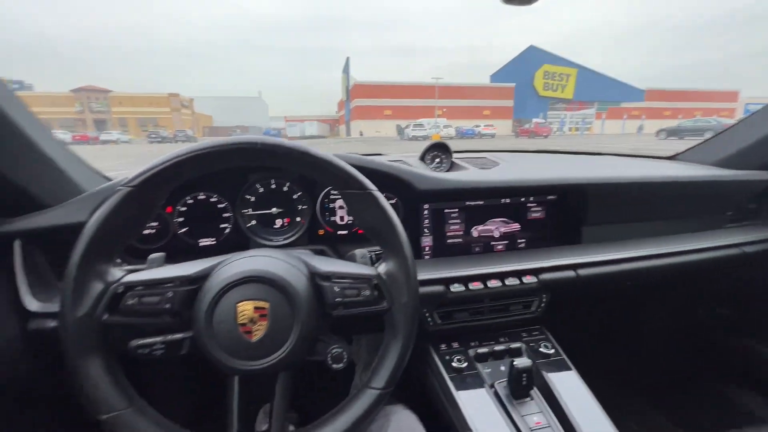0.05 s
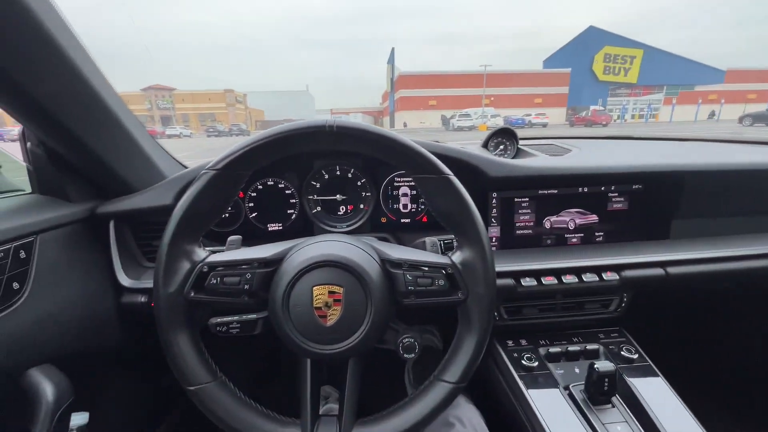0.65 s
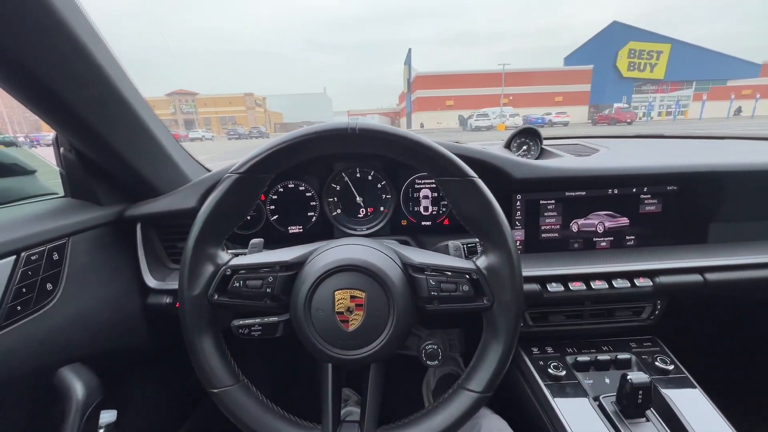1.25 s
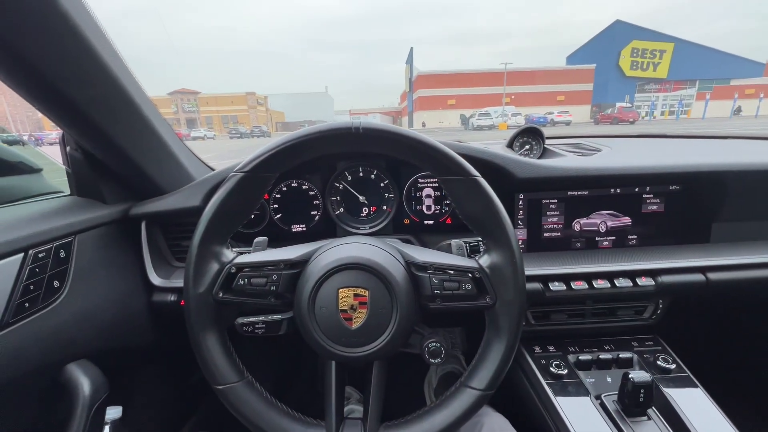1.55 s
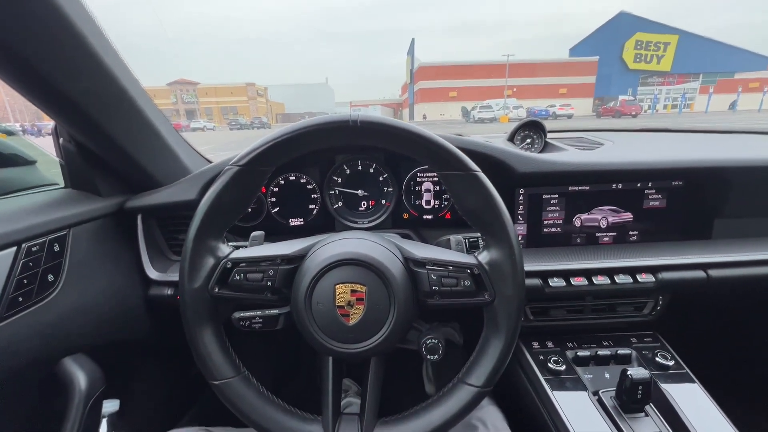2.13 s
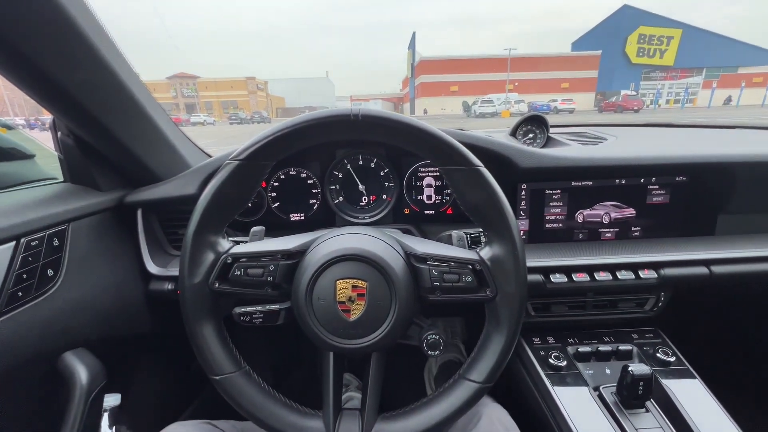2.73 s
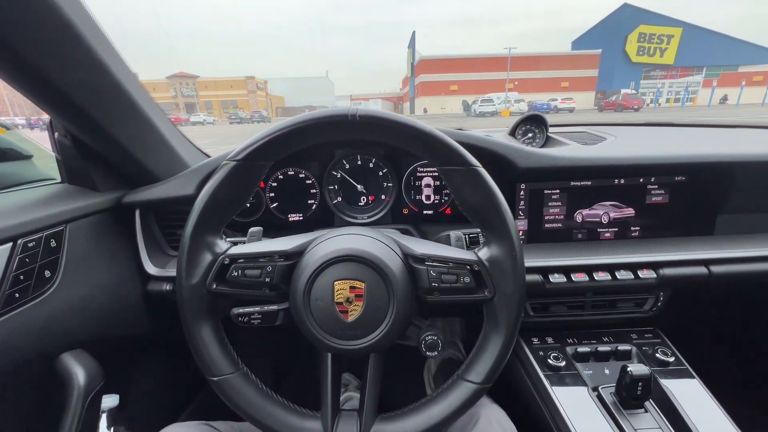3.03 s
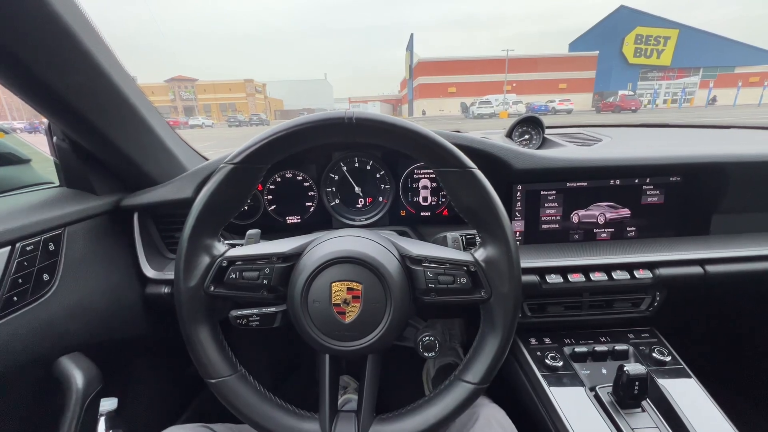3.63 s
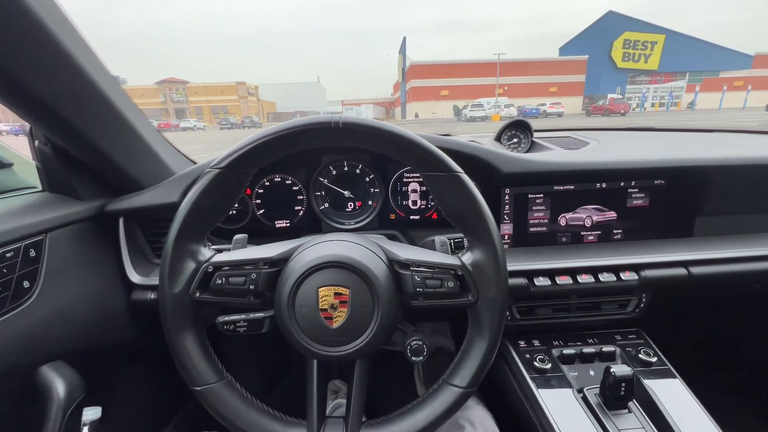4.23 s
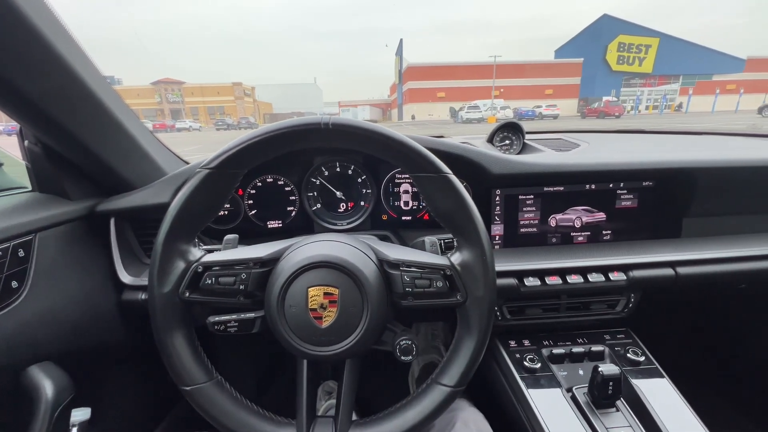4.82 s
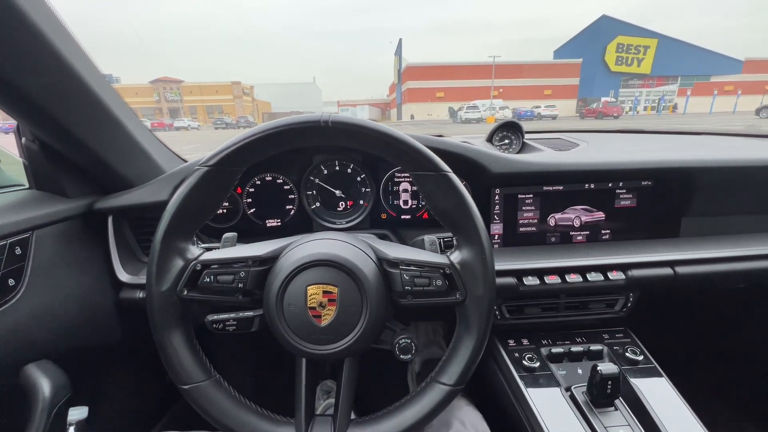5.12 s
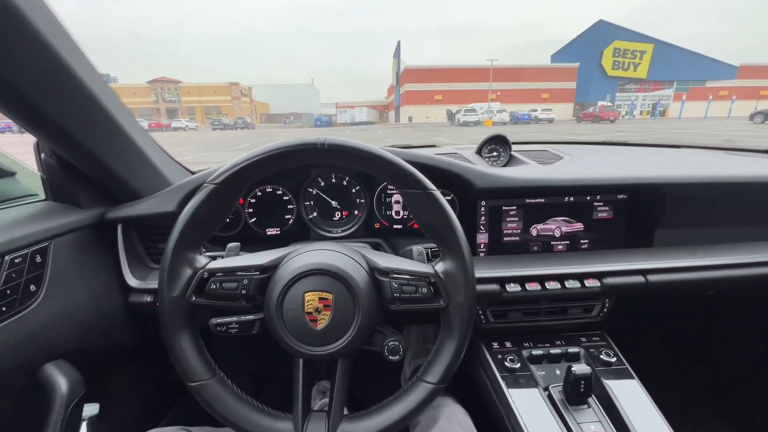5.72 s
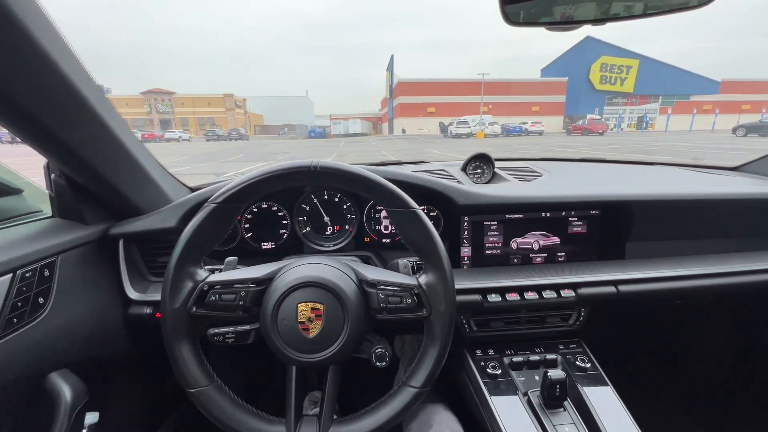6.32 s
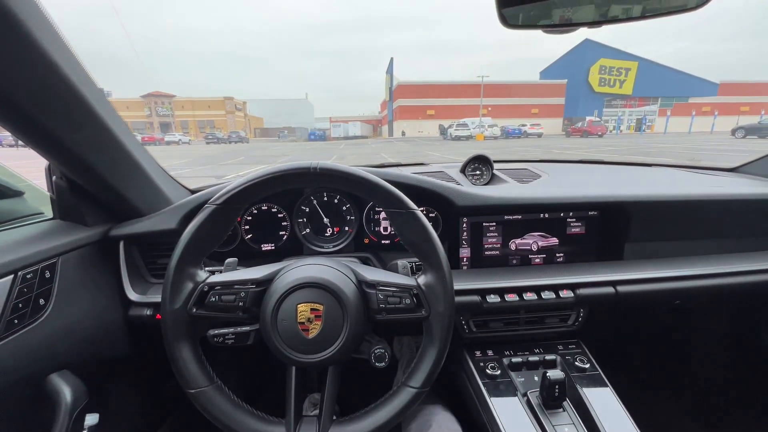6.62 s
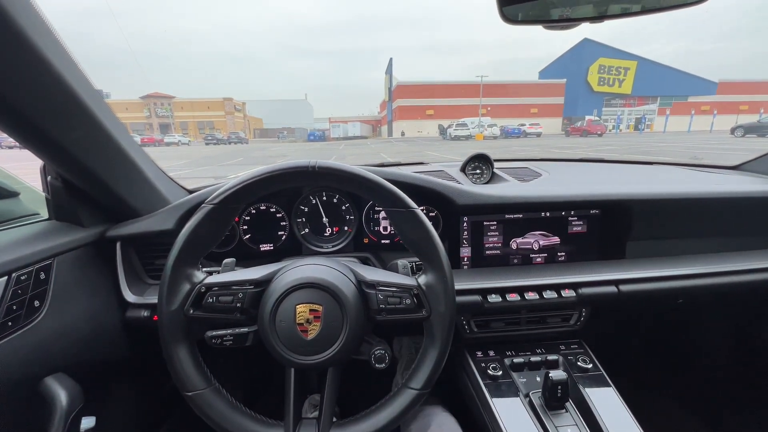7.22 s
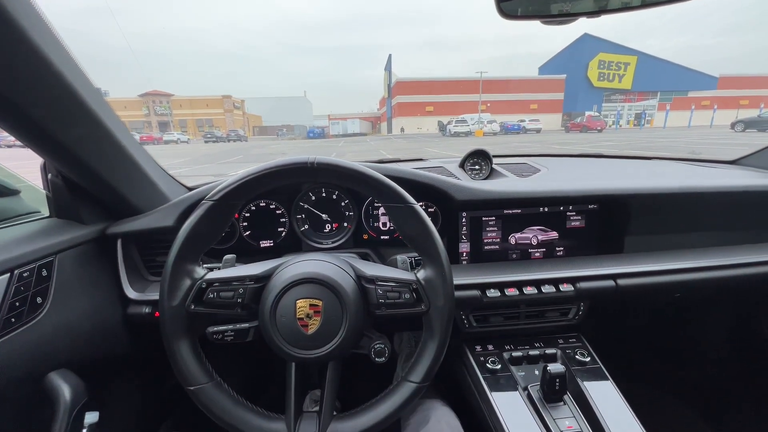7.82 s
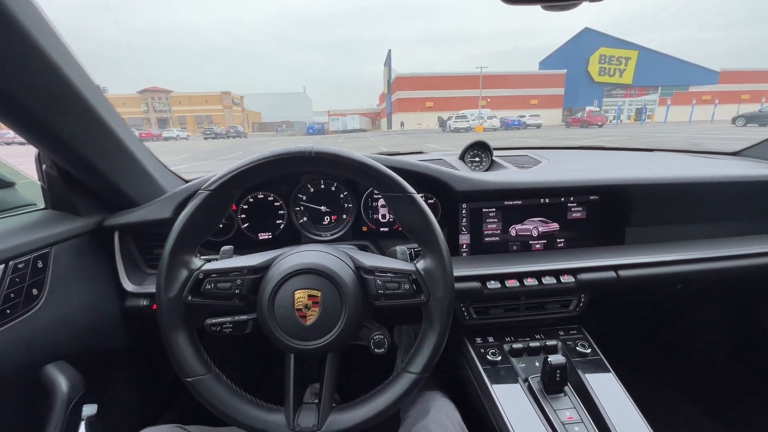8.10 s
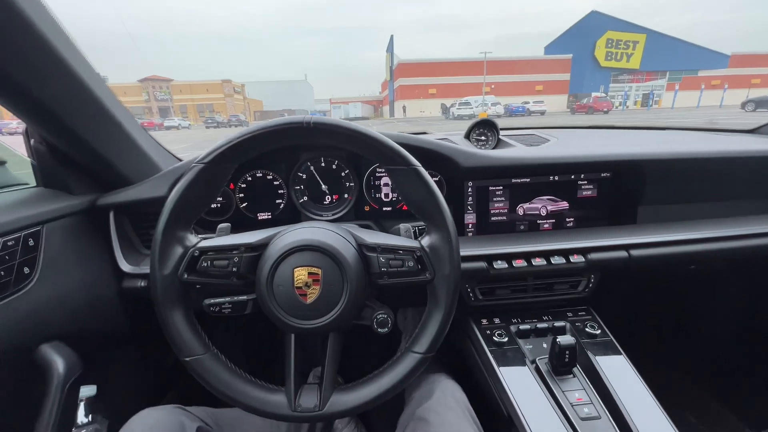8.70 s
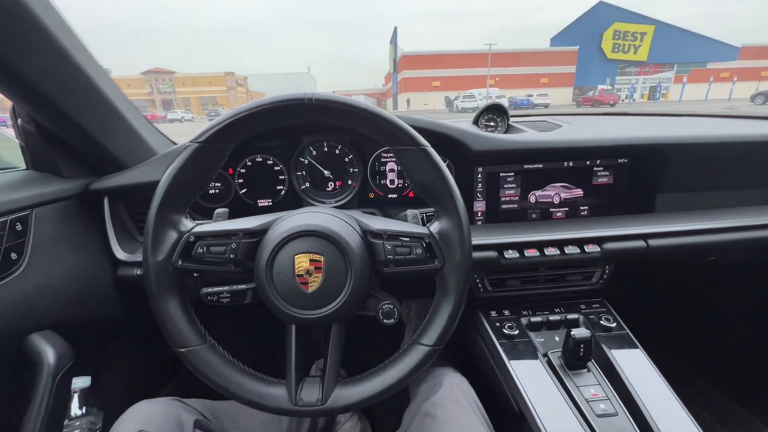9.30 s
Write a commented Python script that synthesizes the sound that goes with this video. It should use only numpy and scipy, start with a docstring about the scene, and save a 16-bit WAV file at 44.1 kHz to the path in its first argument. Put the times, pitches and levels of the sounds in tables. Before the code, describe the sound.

A parked sports car idles low and smooth, then the throttle is blipped eight times, about once a second. Each rev sweeps up into a booming growl with a light rush of intake air and turbo hiss. As the revs sink, the exhaust gives a brief howl, muffled pops and deep thuds, while a faint whine falls. It is heard in stereo from the driver's seat inside the closed cabin.

```python
"""A low, smooth idle, then eight blips of the throttle: a parked flat-six sports car, on a stereo
microphone at the driver's seat. The firing tone sweeps up through the booming cabin. As the revs sink,
the silencer howls, unburnt fuel pops and thuds in the exhaust and a belt-driven whine falls. From the
engine bay, beyond the bulkhead, come intake rush, turbine hiss, valve chatter and a tick as the throttle
shuts. The fuel pump and the ventilation lie faintly underneath."""
import sys
import numpy as np
from scipy import signal
from scipy.fft import irfft
from scipy.io import wavfile
from scipy.ndimage import uniform_filter1d

SR = 44100
rng = np.random.default_rng(int(sys.argv[2]) if len(sys.argv) > 2 else 0)


def bounce(signal):
    """Save signal as a 16-bit WAV file at the path given by the first command-line argument."""
    frames = np.transpose(np.atleast_2d(signal))
    limited = np.clip(frames, -1, 1)
    pcm = np.round(limited * 32767).astype(np.int16)
    wavfile.write(sys.argv[1], SR, pcm)


N = 421155
T = np.arange(N) / SR

# Pedal blips: start t/s, throttle shuts t/s, burble ends t/s, starting firing f/Hz, top firing f/Hz,
# coast-down/(Hz/s), then level/dB for coasting tone, rumble, rasp, whine, pulling tone, chatter, howl,
# bark and turbine hiss
BLIPS = [(.612, 0.887, 1.54, 49, 174.4, 121.6, -5, -.5, -0.5, 3, -0.5, -1.5, -7, -35.5, 3),
         (2.115, 2.37, 2.95, 55.55, 176.9, 132.3, 1, -1, 0, 3, -1, -1.5, 1.5, -33, 3.5),
         (3.275, 3.425, 3.95, 77.97, 156.6, 103.6, 3.5, 0.5, 0.5, -5, -1.5, -1.5, -1.5, -31.5, 4.5),
         (4.204, 4.32, 4.87, 93.22, 156.2, 112.1, -0.5, 0, .7, 0.5, 1, -2.5, -1.5, -33, 4.5),
         (5.048, 5.186, 5.58, 88.6, 154.6, 111.8, 4, 0, 1, 0.5, -1.5, -1.5, -6.5, -31, 3),
         (6.016, 6.25, 6.80, 75.87, 174.8, 140.1, -8.5, -1, -0.6, 2.5, -1, -8, -0.5, -34, 0),
         (6.84, 7.0, 7.6, 116.6, 177.9, 114, -1, -1.5, -0.4, 0.5, 2.5, -7.5, -10, -27.5, 0),
         (8.366, 8.646, 8.5, 59.97, 175.3, 113.1, -3.5, -0.5, -2, -1, -2, -1, -5, -35.5, 0)]
# Firing tone, loud where it meets a cabin mode: firing f/Hz, pulling level/dB, coasting level/dB
TONE_BY_SPEED = [(40.5, -40, -35.5), (47.5, -18, -46), (52.6, -16.5, -19.5), (68, -9, -26),
                 (82, -20.5, -39), (102, -13, -28.5), (149, -22.5, -26.5), (160.4, -21, -28.5),
                 (172, -27, -22.5)]
# Exhaust rasp: firing f/Hz, pulling level/dB, coasting level/dB
RASP_BY_SPEED = [(41, -50, -58.5), (65.4, -44.5, -52), (115, -38, -46.5), (128, -33.5, -37.5),
                 (145, -32.5, -40), (171, -29.5, -38.5)]
# Half-order growl under throttle, loud where it meets a cabin mode: f/Hz, level/dB
GROWL_BY_PITCH = [(75, -43), (130, -38), (175, -25), (203, -22), (225, -46), (267, -39.5), (290, -42)]
# Overtones of the idle, the exhaust and the silencer's howl: multiple of the firing rate, level/dB
IDLE_ORDERS = [(2, -31.5), (3, -28.5), (4, -42.5), (5, -58), (7, -55.5)]
EXHAUST_ORDERS = [(.5, -12), (5 / 6, -13), (1.5, -5), (2, -8), (2.5, -10), (3, 0), (3.5, -2), (4, -2),
                  (4.5, -4), (5, -5), (6, -4), (7, -7), (7.5, -7), (9, -8)]
HOWL_ORDERS = [(3, -33), (3.5, -33), (4, -35), (5, -42)]
# Low and mid rumble: coasting level/dB, then change/dB when pulling, burbling and in the lull
BOOM_BY_STAGE = (-22, -2.5, 1.5, -3)
DRONE_BY_STAGE = (-23, 2, 2, -4.5)
# Stumbles in the firing: t/s, level change/dB, half length/s
STUMBLES = [(.55, -2, 0.034), (2.044, -7, 0.052), (2.667, -3, .04), (3.18, -3, 0.041), (4.102, -0.5, 0.054),
            (4.956, -5, 0.061), (5.784, -7.5, 0.062), (7.365, -6.5, .04), (8.106, -4.5, 0.048),
            (8.98, -4.5, .05)]
# Unburnt fuel popping in the exhaust: t/s, level/dB, decay/s
FUEL_POPS = [(1.338, -19, 0.043), (1.416, -18, 0.023), (1.492, -19, 0.022), (1.53, -20.5, 0.028),
             (1.585, -19, 0.015), (1.678, -23.5, 0.023), (2.754, -19, 0.013), (2.816, -14, 0.016),
             (2.881, -19.5, 0.025), (2.962, -23, 0.02), (2.984, -19, 0.029), (3.039, -24.5, 0.028),
             (3.688, -20.5, 0.065), (3.77, -23.5, 0.022), (3.92, -22, 0.02), (3.94, -18, 0.038),
             (4.525, -21.5, 0.027), (4.666, -18.5, 0.016), (4.691, -22.5, 0.018), (4.749, -23, 0.044),
             (4.822, -18, 0.026), (4.861, -21, 0.01), (5.375, -20.5, 0.02), (5.497, -22, 0.015),
             (5.533, -20, 0.018), (5.643, -18.5, 0.016), (5.655, -13, 0.015), (6.405, -23.5, 0.03),
             (6.462, -26.5, 0.018), (6.513, -20.5, 0.019), (6.647, -19.5, 0.025), (6.682, -18, 0.036),
             (7.439, -22, 0.015), (7.586, -18, 0.018), (7.673, -23.5, 0.016), (7.753, -18, 0.017),
             (7.789, -22, 0.015), (7.83, -26.5, 0.02), (7.868, -23, 0.015), (7.979, -28.5, 0.027),
             (9.066, -22, 0.016), (9.107, -27, 0.019), (9.162, -20, 0.021), (9.211, -19.5, 0.024),
             (9.296, -19.5, 0.017), (9.395, -19.5, 0.017), (9.469, -22.5, 0.018)]
# Late combustion ringing one cabin mode: t/s, level/dB, f/Hz
CABIN_THUDS = [(1.396, -19.5, 121), (1.576, -17.5, 60), (1.674, -17.5, 105.7), (1.74, -20.5, 151.6),
               (1.795, -19.5, 155.2), (1.871, -22.5, 60.06), (2.81, -13.5, 60), (2.881, -22, 63.3),
               (2.909, -22, 115.4), (2.989, -13.5, 63.5), (3.789, -16.5, 64.06), (3.945, -12, 59.7),
               (4.645, -18.5, 66), (4.74, -19.5, 62.1), (4.85, -16.5, 57), (5.5, -14.5, 64.8),
               (5.585, -17.5, 111.7), (5.656, -24, 66), (5.96, -21, 159.8), (6.28, -17, 59.73),
               (6.6, -19.5, 66.03), (7.5, -17.5, 129.9), (7.775, -21, 61.55), (7.965, -21, 151.2),
               (8.2, -28, 120.2), (9.11, -18, 64), (9.219, -17.5, 62.4), (9.31, -21.5, 61.3),
               (9.44, -14.5, 60.9)]
# Valve ticks in the engine bay: t/s, knock level/dB, snap level/dB
VALVE_TICKS = [(0.331, -46, -80), (0.889, -30, -62), (2.3565, -30.5, -70), (3.4001, -25, -49.5),
               (4.2916, -23, -48), (5.15, -28.5, -66), (6.9867, -30.5, -72), (8.6201, -39, -75)]
# Short hisses from the engine bay: t/s, level/dB, decay/s
BAY_HISSES = [(0.324, -80, .015), (.635, -62, .035), (2.125, -72, .05), (2.79, -66.5, .12),
              (3.08, -74, 0.22), (3.96, -60, 0.054), (4.05, -74, .16), (4.84, -73.5, 0.11),
              (4.93, -68.5, 0.098), (5.9, -74, 0.16), (6.796, -56.5, 0.028)]
# Thin whine of the fuel pump: f/Hz, level/dB
PUMP_TONES = [(3472, -83)]

# Each source's spectrum as it reaches the seat, before the shared resonances: f/Hz, relative level/dB
BOOM_PATH = [(12, -40), (25, -13.5), (36, -26.5), (46, -23), (56, -0.5), (64, 0), (75, -5), (86, -12.5),
             (110, -26), (200, -101)]
DRONE_PATH = [(50, -50), (85, -7), (104, 2.5), (130, -1.5), (152, 3.5), (182, -10), (198, -6.5),
              (220, -14.5), (250, -18), (280, -18), (360, -32), (600, -68), (1200, -95.5)]
RASP_PATH = [(120, -40), (230, -14), (285, -0.5), (370, -10.5), (450, -3.5), (600, -11), (740, -12),
             (850, -14), (980, -33), (1400, -29.5), (4000, -78.5)]
POP_PATH = [(50, -19.5), (130, -3.5), (200, 7.5), (290, 5.5), (370, 0), (450, 1.5), (600, -12), (730, -16),
            (850, -15), (1000, -23), (1600, -39.5), (5000, -83)]
INTAKE_PATH = [(300, -28.5), (700, 2.5), (1000, 4.5), (1350, 3.5), (1650, -0.5), (2300, -4.5), (2800, -7.5),
               (3600, -12.5), (6200, -15.5), (8000, -39), (10000, -37), (15000, -52.5)]
GEAR_PATH = [(800, -43), (1040, -9.5), (1140, 2), (1260, -9), (1500, -30), (1720, -13.5), (1890, -11.5),
             (2100, -22.5), (3000, -52.5)]
CHATTER_PATH = [(1200, -30.5), (1470, -2), (1620, -10), (1780, -6.5), (1920, 2.5), (2040, -6.5),
                (2200, -12), (3000, -40)]
TURBINE_PATH = [(2000, -17), (4500, 7.5), (6500, -3), (8500, -2.5), (10000, -8.5), (12000, -19.5),
                (15000, -14.5)]
KNOCK_PATH = [(400, -26), (1000, 8.5), (1400, 14.5), (2200, 5), (3500, 3), (6000, -11.5), (9000, -24),
              (15000, -49.5)]
SNAP_PATH = [(1500, -30), (4000, -0.5), (6500, 5), (10000, -11.5), (15000, -7)]
VENT_PATH = [(120, -19), (200, -4), (380, -4), (530, -17.5), (830, -18.5), (1260, -23), (1630, -22.5),
             (2200, -28), (3000, -32.5), (6000, -41.5), (9000, -51.5), (15000, -62.5)]
# Cabin resonances, plus a faint high ring near 9.5 kHz, shared by every path: f/Hz, width/Hz, lift/dB
SHARED_RESONANCES = [(534, 46, 14), (630, 70, 3), (835, 80, 5), (1143, 95, 7), (1733, 50, 4),
                     (1880, 100, 4.5), (9550, 300, 8)]
# Likeness of the microphone's two ports: f/Hz, likeness/(0-1)
MIC_LIKENESS = [(25, .99), (60, .975), (140, .95), (200, .7), (290, .25), (530, .2), (900, 0), (15000, 0)]
# Balance at the microphone: f/Hz, left minus right level/dB
MIC_BALANCE = [(60, 1.6), (130, 2.4), (220, 3), (380, 0), (540, -3), (630, 2), (720, -2), (820, 1),
               (1200, 2.5), (2300, 1.5), (4400, 10), (6200, 9), (8500, -1), (15000, 0)]
# Lead of the left port: f/Hz, phase/rad
MIC_LEAD = [(30, .05), (70, .2), (130, .25), (300, .1), (600, 0)]

IDLE_HZ = 41.1  # firing rate


def firing(hz, level, cycles, flutter_rad=.2):
    """The firing tone filling the cabin: firm and growling under throttle, ragged off it, even at idle."""
    idling = idle_share(hz)
    phase = 2 * np.pi * cycles
    ragged = (1 - level["pull"]) * (1 - idling)
    tone = (1 + .4 * ragged * wander(600)) * np.sin(phase + .6 * ragged * wander(1100))
    idle = sum(amp(db) * np.cos(k * phase) for k, db in IDLE_ORDERS)
    growl_gain = level["pull"] * amp(read(GROWL_BY_PITCH, 1.5 * hz))
    growl = growl_gain * np.sin(1.5 * phase + flutter_rad * wander(600))
    return np.sqrt(2) * (amp(level["tone"]) * tone + growl + idling * idle)


def engine_speed(overshoot_hz=8, overshoot_s=.05, hang_hz=3, hang_s=.06, flywheel_s=.06):
    """Firing rate in Hz: it climbs, overshoots on the air left in the manifold, hangs, then sinks."""
    knots = [(0, IDLE_HZ), (.46, IDLE_HZ)]  # idle until the first touch of the pedal
    following = [(row[0], row[3]) for row in BLIPS[1:]] + [(np.inf, IDLE_HZ)]
    for (start, shut, _, from_hz, top_hz, coast, *_), (next_start, caught_hz) in zip(BLIPS, following):
        shut_hz, fall_hz = top_hz - overshoot_hz, top_hz - hang_hz
        midway_hz = from_hz + .54 * (shut_hz - from_hz)
        fall = shut + overshoot_s + hang_s
        caught = min(fall + (fall_hz - caught_hz) / coast, next_start)
        knots += [(start, from_hz), ((start + shut) / 2, midway_hz), (shut, shut_hz),
                  (shut + overshoot_s, top_hz), (fall, fall_hz), (caught, caught_hz)]
    return uniform_filter1d(np.interp(T, *np.transpose(knots)), round(flywheel_s * SR))


def idle_share(hz):
    """1 at idle, falling to 0 as the revs lift."""
    return np.interp(hz, [43, 52], [1, 0])


def levels(hz, burble_delay_s=.486, spool_up_db_per_s=50.5, run_down_db_per_s=61):
    """Layer levels in dB, from the revs and the stage of each blip; "pull" is the engine load, 0 to 1."""
    start, shut, burble_end, _, _, _, *trims, _, hiss = np.transpose(BLIPS)
    blip = np.maximum(np.searchsorted(start, T) - 1, 0)
    trims = [uniform_filter1d(trim[blip], size=2000) for trim in trims]
    coast_tone, rumble, rasp, whine, pull_tone, chatter, howling = trims
    pull = during(start - .041, shut + .049, ramp_s=.098)
    burble = during(shut + burble_delay_s, burble_end, ramp_s=.036)  # fuel burns in the exhaust
    lull = during(burble_end[:-1], start[1:], ramp_s=.036)
    idle = during([0], start[:1] - .098, ramp_s=.098)
    stages = np.array([np.ones(N), pull, burble, lull])
    sag, surge_power = stumbles(), surges()
    tone_trim = pull * pull_tone + (1 - pull) * (coast_tone + 4 * wander(1700))  # breaks up off throttle
    gulp_hz = .056 * pull * (155 - hz)  # an open throttle draws air as if the revs were nearer 155 Hz
    past_peak_s = T - shut[:, None] + .015  # the turbines peak just before the throttle shuts
    spool = np.minimum(spool_up_db_per_s * past_peak_s, -run_down_db_per_s * past_peak_s)
    meshing = -.43 * abs(hz - 162) - 9.5 * pull  # loudest coasting through a firing rate of 162 Hz

    def by_speed(table):
        """Blends a table's pulling and coasting levels."""
        rate, pulling, coasting = np.transpose(table)
        return pull * np.interp(hz, rate, pulling) + (1 - pull) * np.interp(hz, rate, coasting)

    def surging(by_stage, surge_db):
        """A rumble level that swells with each pop and sags at each stumble."""
        power = amp(np.dot(by_stage, stages) + rumble) ** 2 + amp(surge_db) ** 2 * surge_power
        return 10 * np.log10(power) + sag

    return dict(pull=pull,
                tone=by_speed(TONE_BY_SPEED) + tone_trim - 4.5 * burble - 4 * lull + sag,
                boom=surging(BOOM_BY_STAGE, surge_db=-1.5),
                drone=surging(DRONE_BY_STAGE, surge_db=-.5),
                rasp=by_speed(RASP_BY_SPEED) + rasp + 2,
                howl=howling - 4 * lull + sag,
                intake=-60.5 + .1152 * (hz + gulp_hz - IDLE_HZ) + 3.5 * pull - 2 * idle,
                belt=-50.5 + meshing + whine,
                gears=-48.5 + meshing + whine / 2,
                chatter=-77 + .1857 * (hz - IDLE_HZ) + chatter,
                turbines=-66.5 + np.max(hiss[:, None] + spool, axis=0),
                chirr=-69.5 + 4 * pull - 19 * idle,
                pump=6 * lull - 19 * idle)


def stumbles():
    """The firing dies away for a moment: its sag in dB."""
    sag, t = np.zeros(N), np.arange(-SR // 4, SR // 4) / SR
    for s, db, half_s in STUMBLES:
        add(sag, s + t[0], db * np.exp(-(t / half_s) ** 2))
    return sag


def exhaust(hz, cycles, level, kick_db=17, idle_duck_db=-13):
    """Overtones and uneven firings ring the pipes and the cabin around the microphone."""
    climb_hz_per_s = uniform_filter1d(np.gradient(hz) * SR, size=2500)
    throttle = np.clip(climb_hz_per_s / 250, 0, 1)
    # combustion is firm under throttle and ragged while coasting down
    rough = np.interp(hz, [42, 60, 100], [.7, .4, .75]) * (1 - .3 * throttle)
    kicks = np.diff(np.floor(cycles), prepend=0) * rng.standard_normal(N)
    for s, db, _ in FUEL_POPS:
        add(kicks, s, np.array([amp(db + kick_db)]))  # each pop also thumps the cabin
    # gas leaves in puffs, the two cylinder banks slightly unequal
    puffs = rng.standard_normal(N) * (1 + .7 * np.cos(2 * np.pi * cycles) + .1 * np.cos(np.pi * cycles))
    idling = idle_share(hz)
    overtones = engine_overtones(cycles, idling)

    def route(path, noise, share, size=2400):
        """One way into the cabin, blending the overtones with a share of noise."""
        tonal, ragged = steady(through(overtones, path)), steady(through(noise, path))
        return steady((1 - share) * tonal + share * ragged, size)

    boom = amp(level["boom"]) * route(BOOM_PATH, kicks, rough)
    drone = amp(level["drone"]) * route(DRONE_PATH, kicks, rough)
    rasp = amp(level["rasp"]) * route(RASP_PATH, puffs, .7 - .12 * throttle, size=2000)
    return (boom + drone) * amp(idle_duck_db * idling) + rasp


def engine_overtones(cycles, idling, step=8):
    """A flickering stack of engine orders; the crank judders and smears the highest ones."""
    shaky = (cycles + .03 * (1 - idling) * wander(600))[::step]
    stack = 0
    for k, db in EXHAUST_ORDERS:
        flicker = 1 + .6 * wander(2000 // step, count=len(shaky))
        stack += amp(db) * flicker * np.cos(2 * np.pi * (k * shaky + rng.random()))
    return signal.resample_poly(stack, step, 1, window=("kaiser", 9))[:N]


def bark(cycles, delay_s=.057, width_s=.04, tail_s=.11, tail_db=-10.5, rough=.58):
    """As the throttle shuts the exhaust barks: a ragged swell of two overtones, with a softer tail."""
    swell, t = np.zeros(N), np.arange(-SR // 4, SR // 2) / SR
    shape = np.maximum(np.exp(-(t / width_s) ** 2), amp(tail_db) * np.exp(-(t / tail_s - .5) ** 2))
    for _, shut, *_, db, _ in BLIPS:
        add(swell, shut + delay_s + t[0], amp(db) * shape)
    phase = 2 * np.pi * cycles + rough / 2 * wander(400)
    overtones = np.sin(2 * phase) + amp(-8) * np.sin(3 * phase)
    return np.sqrt(2) * swell * (1 + rough * wander(500)) * overtones


def howl(hz, cycles, level, note_hz=533.4, width_hz=25, right_db=7):
    """The silencer howls as each overtone sweeps through its note, louder at the right port."""
    note = np.zeros(N)
    for k, db in HOWL_ORDERS:
        resonance = 1 / (1 + ((k * hz - note_hz) / width_hz) ** 2)
        note += amp(db) * resonance * np.sin(2 * np.pi * k * cycles + .6 * wander(600))
    pulsing = 1 + .3 * wander(700) + .3 * np.cos(2 * np.pi * cycles / 6)
    return amp(level["howl"]) * pulsing * note * amp([[-right_db / 2], [right_db / 2]])


def pops(silencer_hz=519.2, ring_s=.0084, ring_db=-9.5):
    """Unburnt fuel goes off in short blasts that ring on in the silencer, muffled by the body."""
    out, t = np.zeros(N), T[:7000]
    swell = t / ring_s * np.exp(1 - t / ring_s)
    for s, db, decay_s in FUEL_POPS:
        note = swell * np.sin(2 * np.pi * (silencer_hz * rng.uniform(.97, 1.03) * t + rng.random()))
        blast = burst(POP_PATH, rise_s=.0028, decay_s=decay_s)
        add(out, s, amp(db + .5) * blast + amp(db + ring_db) * note)
    return out


def surges(decay_s=.082, cap_db=-19):
    """Power of the pressure surge each pop sends down the exhaust; the silencer caps the largest."""
    power = np.zeros(N)
    for s, db, _ in FUEL_POPS:
        add(power, s, amp(db) ** 2 * np.exp(-2 * T[:SR // 2] / decay_s))
    return uniform_filter1d(np.minimum(power, amp(cap_db) ** 2), size=400)


def thuds(rise_s=.037):
    """Late combustion rings a cabin mode around the seat, swelling for a few cycles and dying away."""
    out, t = np.zeros(N), T[:SR // 4]
    swell = (t / rise_s * np.exp(1 - t / rise_s)) ** 2
    for s, db, hz in CABIN_THUDS:
        add(out, s, amp(db) * swell * np.sin(2 * np.pi * (hz * t + rng.random())))
    return out


def intake(pulsing, level):
    """Intake air rushes in the engine bay, throbbing with each firing."""
    return amp(level["intake"]) * steady(through(pulsing * rng.standard_normal(N), INTAKE_PATH))


def valve_train(cycles, level):
    """Timing gear rattles and valves chatter in step with the firing, heard through the bulkhead."""
    teeth = (1 + np.cos(np.pi * cycles)) ** 2 * rng.standard_normal(N)
    taps = (1 + .5 * np.cos(2 * np.pi * cycles)) * rng.standard_normal(N)
    gears = amp(level["gears"]) * steady(through(teeth, GEAR_PATH))
    return gears + amp(level["chatter"]) * through(taps, CHATTER_PATH)


def turbines(pulsing, level, rise_s=.005):
    """The turbines hiss as they spool up and run down, joined by short hisses from the engine bay."""
    power, t = amp(level["turbines"]) ** 2, T[:SR]
    for s, db, decay_s in BAY_HISSES:
        add(power, s, (amp(db) * (1 - np.exp(-t / rise_s)) * np.exp(-t / decay_s)) ** 2)
    return np.sqrt(power) * through(pulsing * rng.standard_normal(N), TURBINE_PATH)


def alternator(hz, level):
    """A belt-driven whine that follows the crank."""
    return amp(level["belt"]) * wavering(6.9 * hz, waver_hz=18)


def ticks():
    """A valve in the engine bay knocks shut, with a bright snap when it closes hard."""
    out = np.zeros(N)
    for s, knock_db, snap_db in VALVE_TICKS:
        knock = burst(KNOCK_PATH, rise_s=.0012, decay_s=.005)
        snap = burst(SNAP_PATH, rise_s=.0012, decay_s=.005)
        add(out, s, amp(knock_db - 2) * knock + amp(snap_db + 8) * snap)
    return out


def fuel_pump(level, band_hz=3048, half_width_hz=55, swing_hz=25, throb_hz=17):
    """The pump's thin whine, and its narrow band of noise that throbs and swings in pitch."""
    whine = amp(level["pump"]) * sum(amp(db) * wavering(hz, waver_hz=12) for hz, db in PUMP_TONES)
    throb = np.sin(2 * np.pi * np.cumsum(throb_hz * (1 + .15 * wander(4000))) / SR)
    lowpass = signal.butter(2, half_width_hz, fs=SR, output="sos")
    grain = signal.sosfilt(lowpass, rng.standard_normal((2, N)))
    phase = 2 * np.pi * np.cumsum(band_hz + swing_hz * throb) / SR
    band = steady(grain[0] * np.cos(phase) + grain[1] * np.sin(phase))
    return whine + amp(level["chirr"]) * (1 - .3 * throb) * band


def ventilation():
    """Faint, steady air from the vents: the cabin's room tone."""
    return amp(-50) * through(rng.standard_normal(N), VENT_PATH)


def cabin(direct, scattered, size=4096):
    """Bass reaches both microphone ports alike; higher up, scatter off glass and trim sets them apart."""
    f = np.fft.rfftfreq(size, 1 / SR)
    likeness = np.clip(read(MIC_LIKENESS, f), 0, 1)
    side = np.array([[1], [-1]])
    ports = amp(side * read(MIC_BALANCE, f) / 2) * np.exp(1j * side * read(MIC_LEAD, f) / 2)
    ports /= np.sqrt(np.mean(abs(ports) ** 2, axis=0))
    spread = side * ports * np.sqrt((1 - likeness) / (1 + likeness))
    fade = signal.windows.tukey(N, .003)

    def heard(x, gain):
        """A sound at both ports."""
        response = np.roll(irfft(gain), size // 2, axis=1)
        return signal.oaconvolve((x * fade)[None], response, axes=1)[:, size // 2:size // 2 + N]

    return heard(direct, ports) + heard(scattered, spread)


def through(x, path, size=8192):
    """Carries a sound to the seat: a causal filter of energy 1, with the shared resonances on top."""
    f = abs(np.fft.fftfreq(size, 1 / SR))
    peaks_db = sum(lift / (1 + (2 * (f - hz) / width) ** 2) for hz, width, lift in SHARED_RESONANCES)
    log_gain = np.log(amp(read(path, f) + peaks_db))
    minimum_phase = np.exp(signal.hilbert(log_gain).conj())
    response = np.fft.ifft(minimum_phase).real[:size // 2]
    return signal.oaconvolve(x, response / np.linalg.norm(response))[:len(x)]


def burst(path, rise_s, decay_s, size=7000):
    """A dying puff of gas or rattle of metal, with a peak near 1."""
    t = np.arange(size) / SR
    fade = np.minimum(2 * (1 - t / t[-1]), 1) ** 2
    shape = (1 - np.exp(-t / rise_s)) ** 2 * np.exp(-t / decay_s) * fade
    noise = steady(through(rng.standard_normal(2 * size), path), size=400)[size:]
    return .5 * shape / shape.max() * noise


def wavering(hz, waver_hz):
    """A sine of rms about 1, unsteady in level and pitch."""
    swell = 1 + .3 * wander(500)
    return np.sqrt(2) * swell * np.sin(2 * np.pi * np.cumsum(hz + waver_hz * wander(200)) / SR)


def wander(size, count=N):
    """Random drift of rms about 1, changing over about size samples."""
    knots = 1.2 * rng.standard_normal(count // size + 2)
    return np.interp(np.arange(count) / size, np.arange(len(knots)), knots)


def steady(x, size=3000):
    """Holds the short-term rms at 1, leaving single beats alone."""
    power = uniform_filter1d(uniform_filter1d(x * x, size), size)
    return x / np.sqrt(abs(power) + 1e-6 * np.mean(x * x))


def during(starts, ends, ramp_s):
    """1 inside the spans and 0 outside, with soft edges."""
    inside = np.any([(T >= a) & (T < b) for a, b in zip(starts, ends)], axis=0)
    return uniform_filter1d(inside.astype(float), round(ramp_s * SR))


def read(points, hz):
    """Interpolates a table on a log-frequency axis."""
    f, value = np.transpose(points)
    return np.interp(np.log(hz + 1), np.log(f), value)


def add(mix, s, sound):
    """Mixes a sound in at time s."""
    part = mix[max(round(s * SR), 0):][:len(sound)]
    part += sound[:len(part)]


def amp(db):
    """Decibels to gain."""
    return 10 ** (np.asarray(db) / 20)


def scene():
    """The car from the driver's seat, every engine layer following one crankshaft."""
    hz = engine_speed()
    level = levels(hz)
    cycles = np.cumsum(hz) / SR  # firings so far
    pulsing = 1 + .051 * np.cos(2 * np.pi * cycles)

    def ragged_layers():
        """Sound whose fine detail differs with the direction it reaches the microphone from."""
        pipes = exhaust(hz, cycles, level) + pops()
        bay = intake(pulsing, level) + valve_train(cycles, level) + turbines(pulsing, level)
        return pipes + bay + alternator(hz, level) + fuel_pump(level) + ticks() + ventilation()

    direct = firing(hz, level, cycles) + thuds() + ragged_layers() + .5 * bark(cycles)
    scattered = ragged_layers() + bark(cycles)
    return cabin(direct, scattered) + howl(hz, cycles, level)


def record(dry):
    """The recorder's band limit, at 15.4 kHz."""
    lowpass = signal.firwin(511, 15400, window=("kaiser", 9), fs=SR)
    return signal.oaconvolve(dry, lowpass[None], "same")


dry = scene()
out = record(dry)
bounce(out)
```